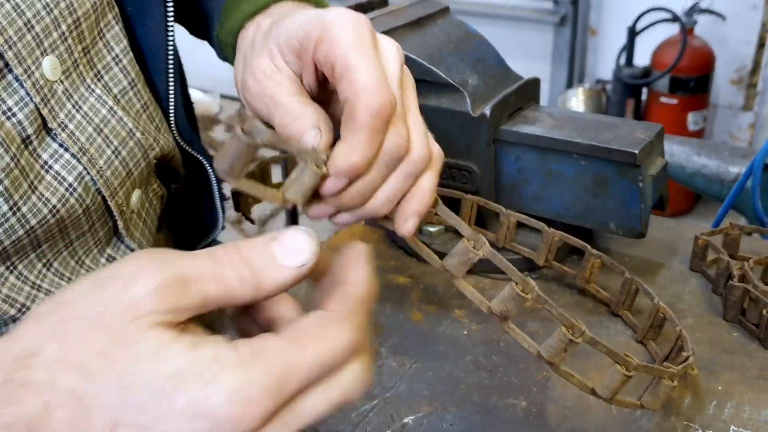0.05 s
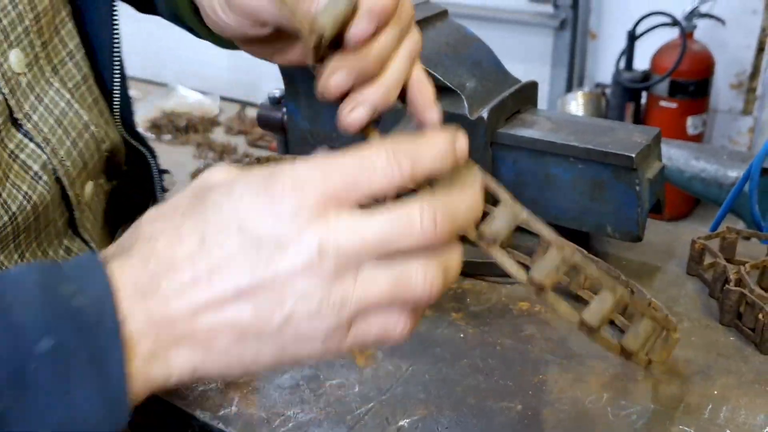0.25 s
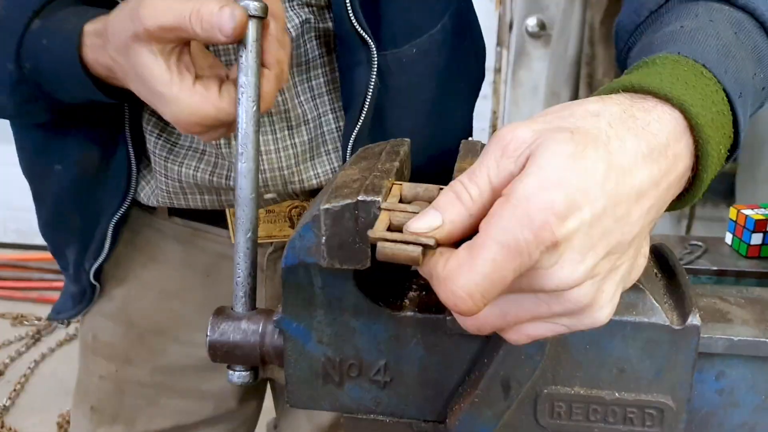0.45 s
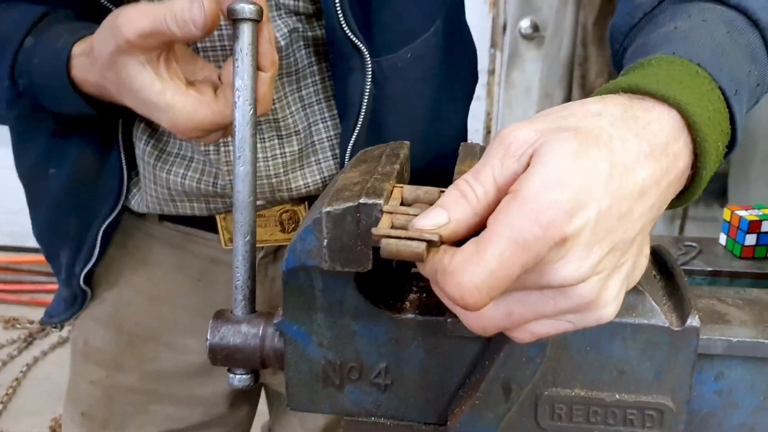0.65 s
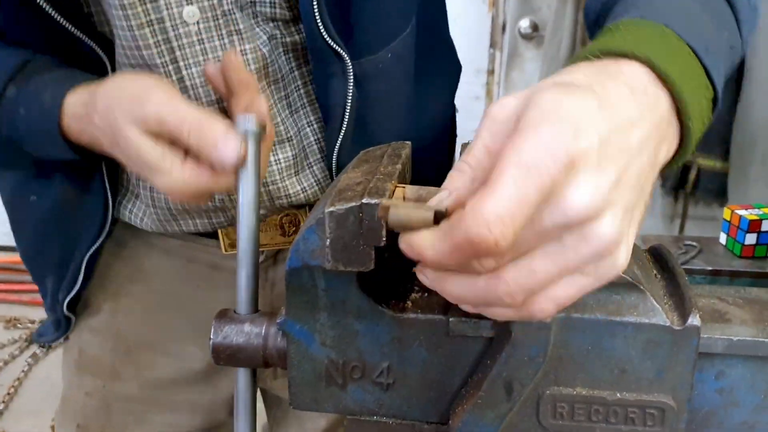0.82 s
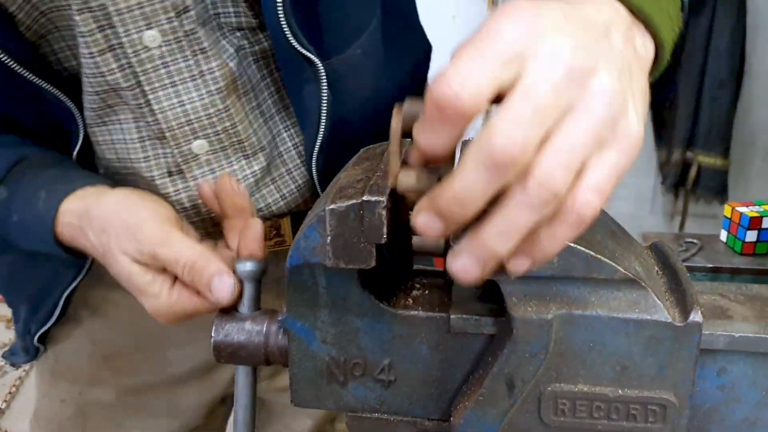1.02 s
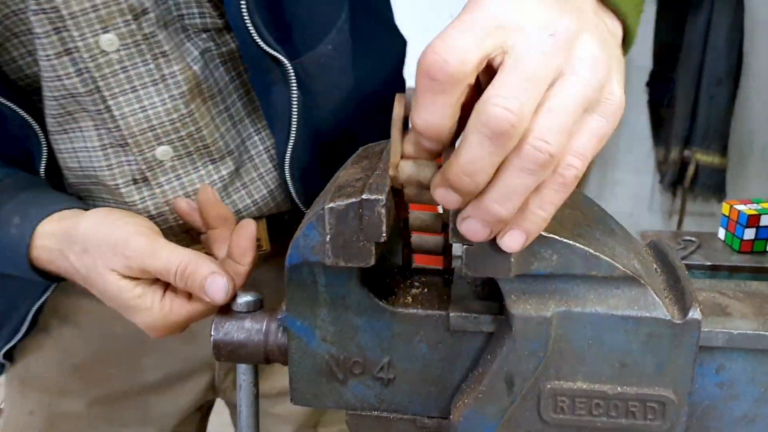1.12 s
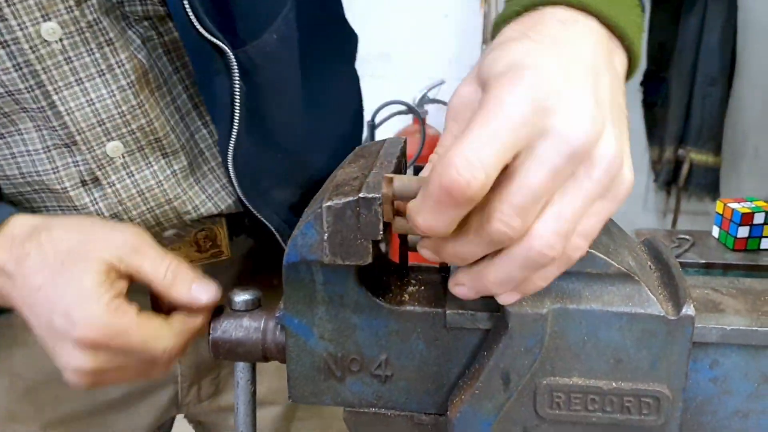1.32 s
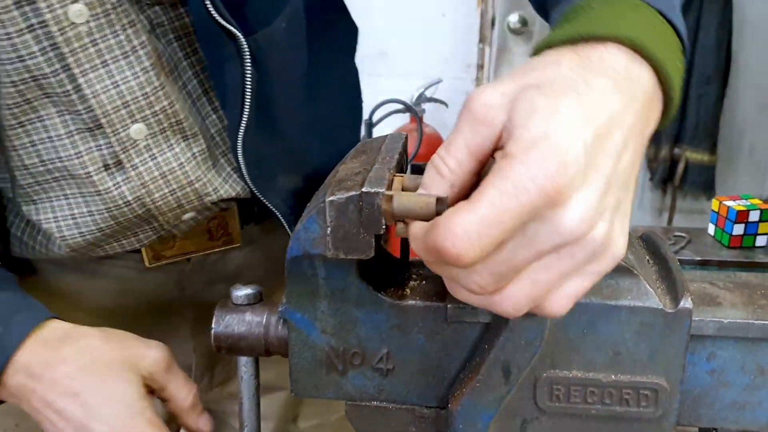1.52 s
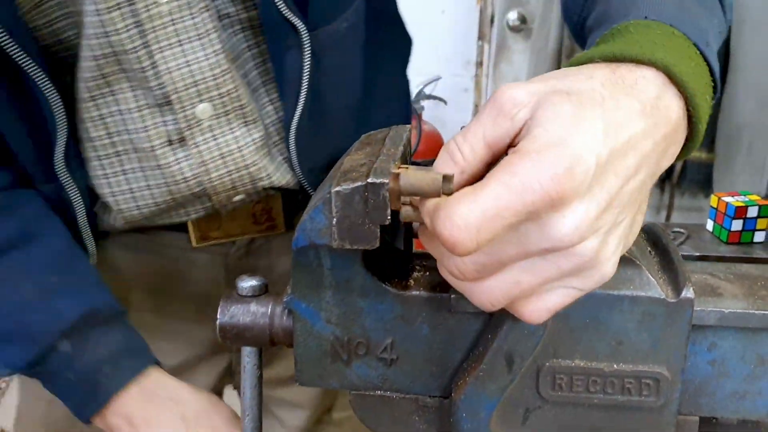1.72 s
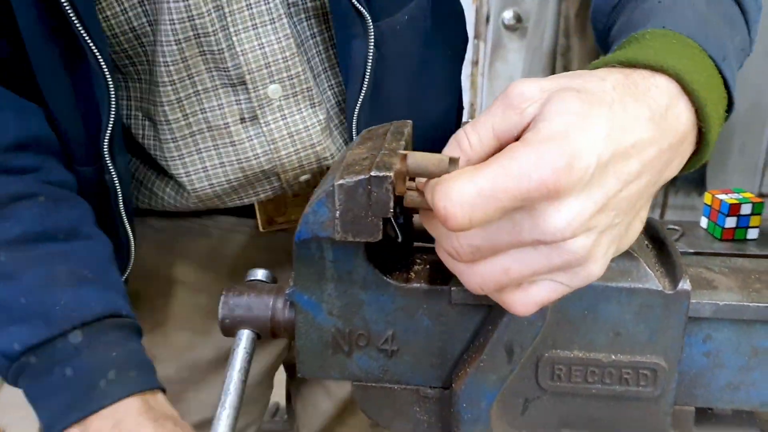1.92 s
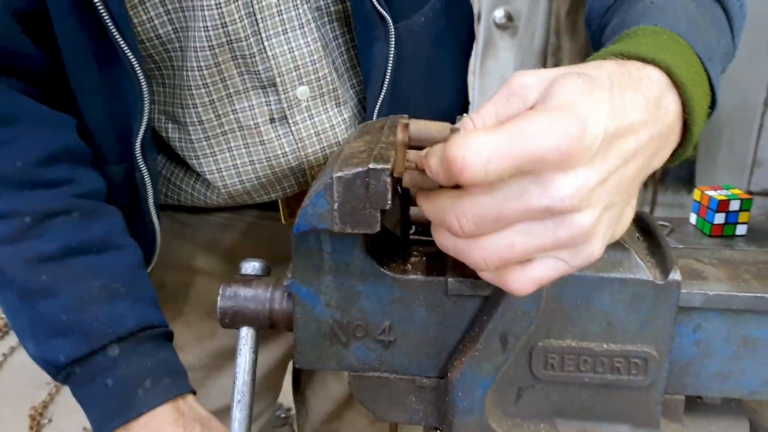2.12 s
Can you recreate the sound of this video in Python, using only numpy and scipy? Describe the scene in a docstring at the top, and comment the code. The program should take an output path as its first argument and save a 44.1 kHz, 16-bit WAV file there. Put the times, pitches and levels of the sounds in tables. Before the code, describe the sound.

Metal clinks and clanks as a chain is handled and a vise is worked.

```python
"""A rusty chain drags off a steel bench and clinks against a vise, then its sound breaks off.
The loose vise handle slides through its hole, knocking, humming and ringing, and hits its stop.
A link scrapes between the jaws and the vise clacks three times, close by in a small workshop.
Hits and scrapes are gritty contact noise ringing the steel's modes; the bench booms underneath."""
import sys
import numpy as np
from scipy import signal
from scipy.fft import rfft, irfft
from scipy.io import wavfile
from scipy.ndimage import uniform_filter1d

SR = 44100
rng = np.random.default_rng(int(sys.argv[2]) if len(sys.argv) > 2 else 0)


def wav_out(sig):
    """Save sig, one row per channel (or a flat mono array), as 16-bit PCM at SR to the path in sys.argv[1]."""
    wavfile.write(sys.argv[1], SR, np.round(np.clip(np.atleast_2d(sig).T, -1, 1) * 32767).astype(np.int16))


N = 94815
T = np.arange(N) / SR
BREAK_S, BREAK_FADE_S = .698, .022  # where the chain's sound stops short


# Link hits. Each row: start in seconds, level in dB, then five band offsets in dB, body to top.
CLINKS = [(0.01, -38, -36, -59, -6, -17, -44), (0.096, -35.5, -41, -23, -6.5, -29, -46),
          (0.119, -38, -26, -20, -7, -26, -49), (0.239, -18.5, -59, -42, -18, -13.5, -12.5),
          (0.376, -27.5, -23, -14, -9.5, -13, -17), (0.411, -23, -20, -22, -29, -18, -9),
          (0.428, -11.5, -31.5, -16.5, -12, -18, -22), (0.478, -22.5, -27, -43, -16, -18, -19.5),
          (0.572, -23.5, -28, -13.5, -11, -13.5, -12.5), (0.598, -11.5, -33.5, -24, -17, -18, -14),
          (0.66, -24.5, -10, -7.5, -43, -30, -15), (1.237, -14, -34.5, -18.5, -13.5, -13.5, -19.5),
          (1.256, -24, -17, -50, -7.5, -12, -43), (1.311, -37, -11, -47, 0.5, -2.5, -18),
          (1.506, -29.5, -17, -52, -6.5, -23, -40), (1.563, -22, -27, -38, -14.5, -17.5, -41)]
# The ring of a link. Each row: pitch in Hz, level in dB, t60 in seconds.
LINK_MODES = [(922.6, 1.5, 0.24), (1380, -4.5, 0.12), (1610, 1, 0.097), (2078, -0.5, 0.16),
              (2437, -2.5, 0.19), (2746, 5.5, 0.076), (3166, -6, 0.22), (3673, 2.5, 0.033), (4600, -6, 0.1),
              (5160, -5, 0.046), (6700, -0.5, 0.027), (7440, -8, 0.028), (8510, -1, 0.15), (11300, 5, .04),
              (10770, 0.5, 0.049), (12700, 7, 0.062), (13000, -10.5, 0.012)]
# Where the clinks sit: left minus right in dB for each band.
CLINK_LEFT_DB = [-1.5, 3.5, 4.5, -2, 5.5]

def clinks(rows):
    """Links strike each other and the vise, each in a different spot."""
    return sum(blow(row, LINK_MODES, swell_s=.004, decay_s=.005, damping_t60=.012, crack_db=-3,
                    ring_db=-11, chatter_db=-17.5, chatter_s=.015, gain_db=-1, lag_s=.003,
                    left=CLINK_LEFT_DB) for row in rows)


# The drag's contour. Each row: time in seconds, then five band levels in dB, body to top.
CHAIN_DRAG = [(0.0, -57.5, -46, -57, -97, -65), (0.126, -78, -101.5, -49.5, -77.5, -88),
              (0.268, -55.5, -67.5, -71, -62, -66), (0.34, -66, -73, -58.5, -76, -75),
              (0.402, -46, -63, -41.5, -52, -44), (0.488, -47.5, -94.5, -51.5, -59, -76.5),
              (0.548, -50.5, -75, -42, -49.5, -54), (0.67, -45.5, -45, -34, -37.5, -42),
              (0.72, -96, -43, -41.5, -63, -52)]

def chain_drag():
    """Rusty links rub over the bench."""
    return rub(CHAIN_DRAG, LINK_MODES, ring_db=-4.5, grain_db=3, catch_hz=111.8, catch_db=2.5,
               gain_db=-2)


# Bright accents. Each row: start in seconds, level in dB.
TINKS = [(.409, -39), (.479, -32.5), (.6, -44)]
# The ring of a free link. Each row: pitch in Hz, level in dB, t60 in seconds.
TINK_MODES = [(3600, -2.5, .08), (7770, -8, .04), (11200, -7, 0.029), (12400, -12, .04),
              (14120, 5.5, 0.048)]

def tinks():
    """A link that the hand does not damp rings briefly on the left."""
    return strikes(TINKS, TINK_MODES, rise_s=.0017, scatter_db=1) * pan(13)


# Handle hits. Each row: start in seconds, level in dB, five band offsets in dB,
# then swell and decay in seconds.
HANDLE_KNOCKS = [(.755,-44,-25,-10,-11,-12,-34,0.0048,.01),
                 (.826,-19.5,-27,-10,-14.5,-29.5,-58,0.0075,0.021),
                 (.921,-16.5,-23.5,-8,-7,-26.5,-51,0.0036,0.03),
                 (0.988,-11,-14,-17.5,-22,-29.5,-60,0.0088,0.0068),
                 (1.052,-14,-28,-5.5,-13,-30,-39.5,0.0034,0.024),
                 (1.083,-9.5,-24.5,-22,-13.5,-22,-51,0.0079,0.002),
                 (1.111,-5.5,-27.5,-13.5,-16.5,-16,-43,0.0046,0.0021)]
# The handle's clank. Each row: pitch in Hz, level in dB, t60 in seconds.
HANDLE_MODES = [(450, -8.5, 0.14), (797, -5.5, 0.13), (1104, -8.5, 0.048), (1153, 3.5, 0.089),
                (1234, 2.5, 0.24), (1315, -9.5, 0.12), (1458, -4.5, 0.12), (1568, -0.5, 0.34),
                (2218, -1, 0.087), (2884, 3, 0.16), (2944, -5, 0.13), (3210, 0, 0.037), (3504, 1, 0.033),
                (3718, 8, 0.023), (4020, -2.5, 0.12), (5570, 10, 0.27)]

def handle_knocks():
    """The sliding handle knocks and judders in its hole."""
    return sum(blow(row, HANDLE_MODES, swell_s, decay_s, damping_t60=.075, crack_db=.5, ring_db=-15.5,
                    chatter_db=-40, chatter_s=.028, gain_db=-1.5)
               for *row, swell_s, decay_s in HANDLE_KNOCKS)


# The slide's contour. Each row: time in seconds, then five band levels in dB, body to top.
HANDLE_SLIDE = [(0.815, -58, -38, -72, -66, -75), (0.879, -36.5, -33.5, -34, -42, -75),
                (0.929, -46.5, -61, -38.5, -79, -71), (0.999, -51, -37, -45, -54, -74),
                (1.047, -62, -47, -33, -43, -59), (1.105, -63, -40.5, -57, -59, -65),
                (1.163, -40, -45.5, -35.5, -35, -68), (1.279, -52.5, -34, -33, -51, -73),
                (1.36, -81, -86, -71, -76, -74)]

def handle_slide():
    """The handle rubs through its hole with a ringing rasp."""
    return rub(HANDLE_SLIDE, HANDLE_MODES, ring_db=2, grain_db=1.5, catch_hz=139.4, catch_db=3.5,
               gain_db=-4)


# The handle's high shimmer. Each row: pitch in Hz, level in dB, t60 in seconds.
SHIMMER_MODES = [(5513, 2.5, 0.079), (8945, -3.5, 0.071), (10800, -31, .1), (13090, -29.5, 0.16)]
# The shimmer's contour. Each row: time in seconds, level in dB.
SHIMMER_LEVELS = [(.59, -65), (.61, -32.5), (.7, -47), (.73, -85), (.805, -56), (.84, -42.5), (.9, -46),
                  (.94, -38), (1.02, -52), (1.1, -37), (1.15, -49), (1.185, -44.5), (1.23, -47),
                  (1.28, -62)]
# Pings. Each row: start in seconds, level in dB, left minus right in dB.
PINGS = [(0.602, -14.5, 1), (0.827, -42, 15), (1.084, -34, -5), (1.112, -19, -10)]

def handle_shimmer():
    """Friction keeps the steel bar singing, and it pings after some blows."""
    catching = flicker(rate_hz=70, depth_db=3.5)
    singing = unit(resonate(grit(N, 2), ring(SHIMMER_MODES, .9)))
    out = singing * catching * contour(*np.array(SHIMMER_LEVELS).T) * pan(-4)
    ping_shape = fade(T, .052) * np.minimum(T / .0061, 1)
    for at, db, left_db in PINGS:
        add(out, ring(SHIMMER_MODES, .33, size=N) * ping_shape * undb(db) * pan(left_db), at)
    return out


# The hum's contour. Each row: time in seconds, level in dB.
HUM_LEVELS = [(.58, -88), (.63, -49), (.69, -41.5), (.73, -91), (.83, -71), (.89, -45), (.975, -39),
              (1.005, -25.5), (1.05, -26.5), (1.125, -49), (1.19, -35.5), (1.25, -43), (1.36, -74)]

def handle_hum(pitch_hz=239, wander_depth=.015):
    """The handle's lowest bending mode hums, slightly unsteady in pitch."""
    wander = np.interp(T, np.linspace(0, T[-1], 70), rng.standard_normal(70))
    phase = 2 * np.pi * np.cumsum(pitch_hz * (1 + wander_depth * wander)) / SR
    hum = np.sin(phase + np.array([[.5], [0]]))  # the left side leads
    return unit(hum) * contour(*np.array(HUM_LEVELS).T)


# Vise hits. Each row: start in seconds, level in dB, then five band offsets in dB, body to top.
CLACKS = [(1.775, -21.5, -30, -12, -8.5, -21, -41), (1.864, -15, -16.5, -23.5, -5.5, -22, -39.5),
          (2.016, -31.5, -9, -12, -7.5, -18, -63)]
# The ring of the vise. Each row: pitch in Hz, level in dB, t60 in seconds.
VISE_MODES = [(214.6, 0, 0.33), (307, -5, 0.22), (467, -13.5, 0.48), (820, -14, 0.18), (1122, 2.5, 0.22),
              (1568, 4, .25), (1675, -12, 0.22), (1896, -0.5, 0.47), (2220, -2, 0.42), (2650, -40, 0.12),
              (2690, 5, 0.19), (2938, 6.5, 0.12), (3250, -31, 0.078), (3690, -19, 0.16), (4210, -7, .18),
              (5740, 1, .07)]

def vise_clacks():
    """The screw and jaw take up their slack."""
    return sum(blow(row, VISE_MODES, swell_s=.0033, decay_s=.0064, damping_t60=.0078, crack_db=-15,
                    ring_db=-16, chatter_db=-13, chatter_s=.047, gain_db=-.5, scatter_db=2.5)
               for row in CLACKS)


# The scrape's contour. Each row: time in seconds, then five band levels in dB, body to top.
JAW_SCRAPE = [(1.36, -78, -68, -53.5, -57, -72), (1.428, -53, -45, -39.5, -41, -60.5),
              (1.47, -59, -76, -56, -54, -71), (1.506, -52, -44, -36.5, -41, -56),
              (1.546, -50, -56, -39.5, -39.5, -47), (1.574, -53.5, -54.5, -42, -49, -55),
              (1.684, -71, -64, -63, -80, -87), (1.7, -64, -82, -78, -87, -91)]

def jaw_scrape():
    """A link scrapes between the jaws, with hardly any ring."""
    return rub(JAW_SCRAPE, VISE_MODES, ring_db=-25.5, grain_db=0, catch_hz=166, catch_db=2, gain_db=-1)


# Weight under the hits. Each row: start in seconds, relative level in dB.
HOLLOW_KNOCKS = [(.252, -37.5), (.93, -22.5), (1.302, -23), (1.495, -32.5), (1.6, -35.5), (1.785, -28),
                 (1.875, -37), (2.022, -30.5)]
# The vise's hollow tone. Each row: pitch in Hz, level in dB, t60 in seconds.
HOLLOW_MODES = [(300, -6, 0.1), (353, -3.5, .1), (453.8, 4.5, 0.054), (500.7, 2, 0.11), (579, -10, 0.3),
                (676, -18, 0.3)]

def hollow_knocks():
    """The heavy vise body knocks in its low modes."""
    return strikes(HOLLOW_KNOCKS, HOLLOW_MODES, rise_s=.002) * undb(-14.5)


# Bench booms. Each row: start in seconds, relative level in dB.
BOOMS = [(.67, -53.5), (0.869, -39.5), (.985, -31.5), (1.1, -44), (1.2, -41), (1.49, -54), (1.78, -37),
         (1.852, -32)]
# The bench's low end. Each row: pitch in Hz, level in dB, t60 in seconds.
BENCH_MODES = [(78.3, -12, 0.46), (108.3, -2.5, 0.3), (118.3, -3, 0.15)]

def bench(bump_hz=69):
    """The bench booms under the vise; one soft low bump sounds on the right."""
    out = strikes(BOOMS, BENCH_MODES, rise_s=.02) * undb(-1)
    bump = np.sin(2 * np.pi * bump_hz * T) * fade(T, .2) * np.minimum(T / .0081, 1)
    add(out, bump * undb(-25.5) * np.array([[.05], [1]]), at=.498)
    return out


# Where the rubs, handle knocks and clacks sit: left minus right in dB for each band.
STEEL_LEFT_DB = [-2.5, 2, 5.5, -0.5, 1]

def blow(row, modes, swell_s, decay_s, damping_t60, crack_db, ring_db, chatter_db, chatter_s, gain_db,
         lag_s=.002, scatter_db=2, left=STEEL_LEFT_DB, size=17640):
    """Rough faces grind and part: a crack, a hand-damped clack, chatter and a faint free ring."""
    at, level_db, *colour = row
    t = T[:size] - .04  # the force peaks at t = 0
    after = np.maximum(t, 0)
    release = np.exp(-after / decay_s) + undb(chatter_db) * np.exp(-after / chatter_s)
    force = grit(size, 2.4) * np.exp(np.minimum(t, 0) / swell_s) * release
    metal = ring(modes, scatter_db, size)
    clack = resonate(force, metal * fade(T[:size], damping_t60))
    hit = undb(crack_db) * force + clack + undb(ring_db) * resonate(force, metal)
    start = at + lag_s + t[0]
    skip = int(max(-start, 0) * SR)
    out = np.zeros((2, N))
    for band, db, left_db in zip(split(hit), colour, left):
        peak_rms = np.sqrt(uniform_filter1d(np.mean(band ** 2, axis=0), size=440).max())
        gain = undb(level_db + db + gain_db) / peak_rms
        add(out, band[:, skip:] * gain * pan(left_db), max(start, 0))
    return out


def rub(curve, modes, ring_db, grain_db, catch_hz, catch_db, gain_db):
    """Rusty steel catches and slips; the grit keeps the modes ringing."""
    times, *levels = np.array(curve).T
    contact = grit(N, grain_db) * flicker(catch_hz, catch_db)
    body = unit(signal.fftconvolve(contact[:1], ring(modes, .34), axes=1)[:, :N])
    out = 0
    for band, db, left_db in zip(split(contact + undb(ring_db) * body), levels, STEEL_LEFT_DB):
        out = out + unit(band) * contour(times, db) * pan(left_db)
    return out * undb(gain_db) * np.clip((T - times[0]) / .0082, 0, 1)


def strikes(rows, modes, rise_s, scatter_db=1.5):
    """A struck body rings freely after a softened attack."""
    out = np.zeros((2, N))
    attack = np.minimum(T[:22050] / rise_s, 1)
    for at, db in rows:
        add(out, ring(modes, scatter_db) * attack * undb(db), at)
    return out


def ring(modes, scatter_db, size=22050):
    """Decaying modes; the higher ones reach the two sides out of step."""
    t, out = T[:size], 0
    for hz, db, t60 in modes:
        phase = rng.standard_normal((2, 1)) * min(hz / 1600, 1.5)
        gain = undb(db + scatter_db * rng.standard_normal())
        out = out + gain * fade(t, t60) * np.cos(2 * np.pi * hz * t + phase)
    return out


def resonate(force, response):
    """Drive a resonator of unit energy."""
    return signal.fftconvolve(force, response / np.linalg.norm(response[0]), axes=1)[:, :force.shape[1]]


def grit(size, spread_db):
    """Stereo noise of tiny rust contacts, uneven in strength."""
    strength = undb(spread_db * np.repeat(rng.standard_normal(size // 32 + 1), 32)[:size])
    return unit(rng.standard_normal((2, size)) * strength)


def flicker(rate_hz, depth_db):
    """A gain that wanders as the contact catches and slips."""
    return unit(undb(depth_db * np.interp(T * rate_hz, np.arange(400), rng.standard_normal(400))))


# Edges in Hz of the five bands: body, low mids, mids, treble, top.
BAND_EDGES_HZ = [180, 720, 1750, 4200, 7400, 15000]

def split(x):
    """The five bands of a stereo sound."""
    return [signal.sosfilt(signal.butter(5, edges, "band", fs=SR, output="sos"), x)
            for edges in zip(BAND_EDGES_HZ, BAND_EDGES_HZ[1:])]


def contour(times, db):
    """A fader ride through points in dB, shut before and after."""
    return undb(np.interp(T, times, db, left=-120, right=-120))


def undb(db):
    """Decibels to gain."""
    return 10 ** (np.asarray(db) / 20)


def unit(x):
    """Scale to rms 1."""
    return x / np.sqrt(np.mean(x ** 2) + 1e-20)


def fade(t, t60):
    """Exponential decay, 60 dB down after t60 seconds."""
    return np.exp(-np.log(1000) * t / t60)


def pan(left_db):
    """Left and right gains."""
    return undb(np.array([[left_db], [-left_db]]) / 2)


def add(out, x, at):
    """Mix x in at a time in seconds."""
    i = int(np.clip(at * SR, 0, N - 1))
    out[:, i:i + x.shape[1]] += x[:, :N - i]


# The reverb. Each row: band centre in Hz, t60 in seconds, wet level in dB.
REVERB = [(150, 0.45, 2), (500, 0.17, -4.5), (1420, 0.37, -2.5), (2840, 0.16, -7), (5960, 0.3, -11.5),
          (12200, 0.19, -15.5)]

def workshop(x, build_s=.0094, size=26460):
    """Dense reflections of a small room, alike on both sides in the bass."""
    t, hz = T[:size], np.fft.rfftfreq(size, 1 / SR)
    mid, side = rfft(rng.standard_normal((2, size)))
    width = np.minimum(hz / 700, 1)
    noise = (mid + side * width * np.array([[1], [-1]])) / np.sqrt(1 + width ** 2)
    tail = 0
    for share, (_, t60, db) in zip(np.eye(len(REVERB)), REVERB):
        envelope = fade(t, t60) * np.minimum(t / build_s, 1)
        band = np.interp(np.log(hz + 1), np.log(np.array(REVERB)[:, 0]), share)
        tail = tail + irfft(noise * band, size) * envelope / np.linalg.norm(envelope) * undb(db)
    return x + signal.fftconvolve(x, tail, axes=1)[:, :N]


# The room tone's colour. Each row: frequency in Hz, relative level in dB.
ROOM_TONE = [(18, -57), (30, 2), (150, -14), (222, -11.5), (497, -5), (774, -18), (2770, -11), (5580, -18),
             (15000, -36)]

def room_tone(level_db=-60):
    """Faint steady room noise."""
    hz, db = np.array(ROOM_TONE).T
    gain = undb(np.interp(np.log(np.fft.rfftfreq(N, 1 / SR) + 1), np.log(hz), db))
    return unit(irfft(rfft(rng.standard_normal((2, N))) * gain, N)) * undb(level_db)


def scene():
    """The chain is moved, then its sound stops short, reverb and all; then the vise is worked."""
    drag, slide, scrape, hollow = chain_drag(), handle_slide(), jaw_scrape(), hollow_knocks()
    handle_ring = handle_shimmer() + handle_hum()
    chain = workshop(clinks(row for row in CLINKS if row[0] < BREAK_S) + drag + tinks())
    late_clinks = clinks(row for row in CLINKS if row[0] > BREAK_S)
    vise = workshop(late_clinks + handle_knocks() + slide + scrape + vise_clacks() + hollow)
    chain_gate = np.clip((BREAK_S - T) / BREAK_FADE_S + 1, 0, 1) ** 2
    handle_gate = chain_gate + (T > HANDLE_KNOCKS[0][0])  # reopens at the first knock
    return chain * chain_gate + handle_ring * handle_gate + vise + bench() + room_tone()


def record(dry, top_hz=15200):
    """A steep low-pass takes off the very top."""
    return signal.sosfilt(signal.ellip(8, .2, 70, top_hz, fs=SR, output="sos"), dry)


dry = scene()
out = record(dry)
wav_out(out)
```